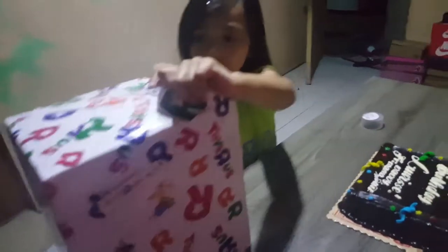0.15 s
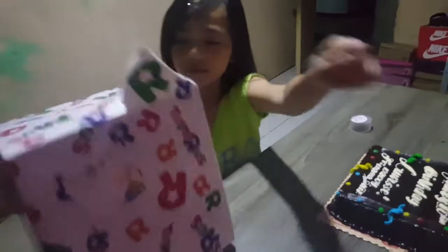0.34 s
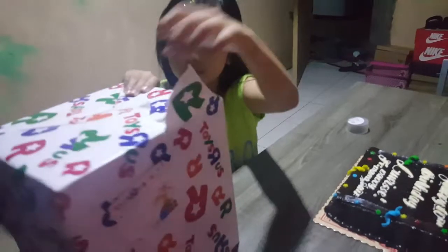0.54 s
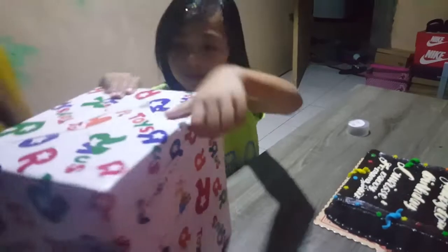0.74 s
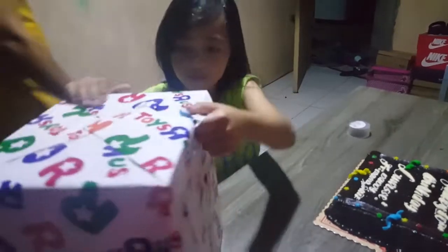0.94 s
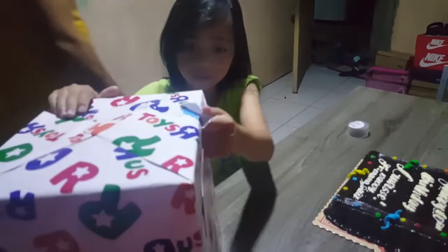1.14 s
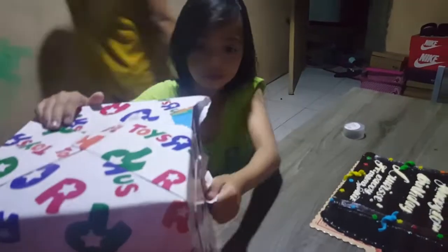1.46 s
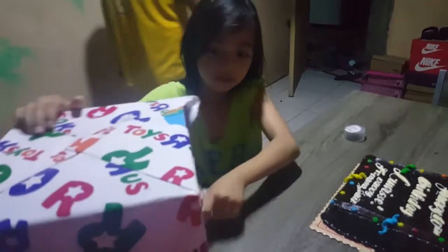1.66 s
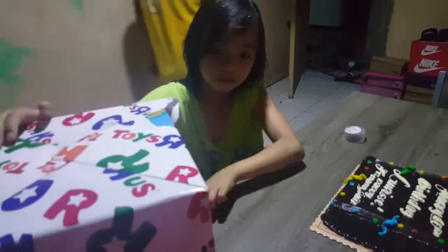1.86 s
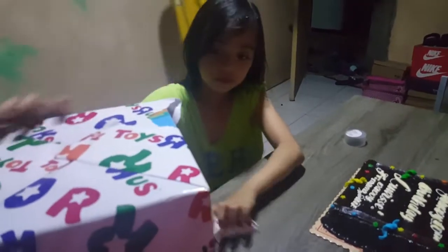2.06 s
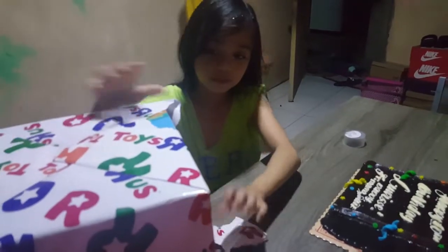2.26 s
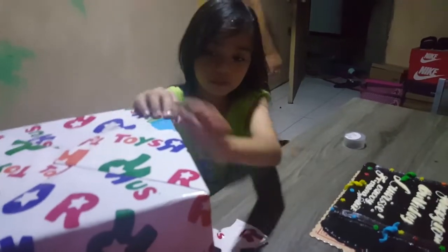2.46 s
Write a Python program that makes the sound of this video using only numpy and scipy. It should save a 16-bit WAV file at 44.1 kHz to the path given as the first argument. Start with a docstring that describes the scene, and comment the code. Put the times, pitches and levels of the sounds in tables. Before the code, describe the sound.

Wrapping paper tears off a cardboard box in a small reverberant room. Light rustles and snaps lead to a loud jerking rip and knock at 0.2 s, then hollow scraping and low judder to 0.6 and again near 0.8. Sound drops out from 1.05 to 1.2. A second crackling rip at 1.3 ends in a deep thud at 1.45; a strip peels from 1.6 to 1.9, a scrape, then snaps at 2.2 and a faint squeak.

```python
"""In a small, hard-walled room, wrapping paper is pulled and torn off a cardboard box.
Tearing and rubbing are dense runs of clicks over a fine hiss; sheet snaps and one hand rub are rough rings with a crack.
The knocked box is a push, a thud and ringing panels; it judders over the floor as a wavering low tone.
Cardboard scrapes are a hollow rumble of clicks, with one faint squeak. Quiet air noise lies under it all.
The sound drops out once, briefly."""
import sys
import numpy as np
from scipy import signal
from scipy.fft import rfft, irfft, next_fast_len
from scipy.io import wavfile
from scipy.ndimage import uniform_filter1d, map_coordinates

SR = 44100
rng = np.random.default_rng(int(sys.argv[2]) if len(sys.argv) > 2 else 0)


def put_to_file(sound):
    """Save the sound as 16-bit audio at rate SR, in the file named by the first command-line argument."""
    columns = np.atleast_2d(sound).T  # one column per channel
    safe = np.clip(columns, -1, 1)
    whole_steps = np.round(safe * 32767)
    wavfile.write(sys.argv[1], SR, whole_steps.astype(np.int16))


N = 114660  # length in samples


def amp(db):
    """Turn decibels into a gain."""
    return 10 ** (np.asarray(db) / 20)


def unit(x):
    """Scale a signal to an average strength (rms) of 1."""
    return x / np.sqrt(np.mean(x ** 2) + 1e-20)


def along(points, hz):
    """Read a curve of (Hz, value) points on a log frequency axis."""
    point_hz, values = np.transpose(points)
    return np.interp(np.log(hz + 1), np.log(point_hz + 1), values)


def level(rows):
    """Gain for each sample from (seconds, dB) points, practically silent outside them."""
    seconds, db = np.transpose(rows)
    return amp(np.interp(np.arange(N) / SR, seconds, db, left=-120, right=-120))


def filtered(x, response):
    """Multiply the spectrum of x by a function of frequency."""
    n = x.shape[-1]
    padded = next_fast_len(n + 8192)
    return irfft(rfft(x, padded) * response(np.fft.rfftfreq(padded, 1 / SR)), padded)[..., :n]


def coloured(x, colour, size=4096):
    """Give x a tone colour with a filter that never sounds ahead of its input; rms becomes 1."""
    log_gain = along(colour, np.fft.rfftfreq(size, 1 / SR)) * np.log(10) / 20
    # folding the cepstrum into its first half makes the filter minimum-phase
    cepstrum = irfft(log_gain)
    cepstrum[1:size // 2] *= 2
    cepstrum[size // 2 + 1:] = 0
    impulse = irfft(np.exp(rfft(cepstrum)))
    return unit(signal.fftconvolve(x, impulse)[:len(x)])


def wobble(rate):
    """A smooth random curve through `rate` random points a second."""
    knots = rng.standard_normal(4096)
    return map_coordinates(knots, [np.arange(N) * rate / SR], mode="wrap")


def add(track, s, sound):
    """Mix a sound into the track at s seconds."""
    part = track[max(0, round(s * SR)):][:len(sound)]
    part += sound[:len(part)]


def crackle(rate, colour, spread_db, clump_db, patchy_db, hiss_db):
    """Clumped clicks of uneven size and changing colour over a fine hiss, at rms 1."""
    hits = rng.random(N) < rate / SR
    signs = np.sign(rng.standard_normal(N))
    sizes = amp(spread_db * np.minimum(rng.exponential(size=N), np.pi))
    hiss = amp(hiss_db) * rng.standard_normal(N)
    run = (unit(hits * signs * sizes) + hiss) * amp(clump_db * wobble(220))
    # random patches in time and frequency are made louder or softer
    spectrum = signal.stft(run, nperseg=128)[2]
    field = uniform_filter1d(rng.standard_normal(spectrum.shape), size=3, axis=0)
    field = uniform_filter1d(field, size=4, axis=1)
    patchy = signal.istft(spectrum * amp(patchy_db * unit(field)))[1][:N]
    return coloured(patchy, colour)


def diffuse(pair):
    """Blend two unrelated signals into left and right that are alike in the bass and differ higher up."""
    # Each row: frequency in Hz, left-right likeness (1 is identical)
    likeness = [(100, 0.89), (350, 0.99), (700, 0.21), (1500, 0.15), (10000, 0.033)]

    def shares(hz):
        turn = np.arccos(np.clip(along(likeness, hz), -1, 1)) / 2
        return np.array([np.cos(turn), np.sin(turn)])

    mid, side = filtered(pair, shares)
    return np.array([mid + side, mid - side])


def room_air():
    """The room's quiet air: steady noise, strongest in the bass and spread over both sides."""
    # Tone colour of the air. Each row: frequency in Hz, strength in dB per Hz
    air_colour = [(20, -18.5), (60, -13.5), (130, 3.5), (400, -4.5), (1000, -8), (2600, -13), (5000, -26),
                  (15000, -43)]
    air_db = -55.5
    noises = [coloured(rng.standard_normal(N), air_colour) for _ in range(2)]
    return amp(air_db) * diffuse(np.array(noises))


def squeak():
    """A faint, short, slightly unsteady tone."""
    # Each row: time in seconds, level in dB
    squeak_levels = [(2.34, -62), (2.362, -50.5), (2.382, -55)]
    squeak_hz = 630  # middle pitch
    pitch = squeak_hz * (1 + 0.0053 * wobble(43))
    return level(squeak_levels) * unit(np.sin(2 * np.pi * np.cumsum(pitch) / SR))


def scrape():
    """Small slips of the cardboard make a hollow rumble as the box is shoved and turned."""
    # Each row: time in seconds, level in dB
    scrape_levels = [(0, -52.5), (.085, -38), (.2, -51.5), (.32, -36), (.375, -29), (.45, -32.5),
                     (.53, -53), (.73, -67), (.78, -52), (.88, -46), (1.0, -52.5), (1.25, -60.5),
                     (1.3, -41.5), (1.6, -48), (1.86, -64), (1.89, -31), (1.94, -54), (2.1, -56.5)]
    # Tone colour of the scrape. Each row: frequency in Hz, strength in dB per Hz
    scrape_colour = [(25, -28.5), (90, -2.5), (200, -0.5), (350, 0), (550, -4), (750, -10.5), (1100, -10),
                     (4000, -47.5)]
    slips = crackle(900, scrape_colour, spread_db=-1, clump_db=5.5, patchy_db=0, hiss_db=-9.5)  # 900 slips a second
    return level(scrape_levels) * slips


def drag():
    """The box judders over the floor in stick and slip: a wavering low tone and its octave."""
    # Each row: time in seconds, level in dB, before a slight random waver
    drag_levels = [(0, -52.5), (.1, -60), (.19, -62), (.25, -47), (.31, -52.5), (.38, -32), (.48, -33),
                   (.59, -37), (.65, -61), (.75, -70), (.775, -38), (.89, -31), (1.04, -39.5),
                   (1.21, -43.5), (1.34, -50), (1.6, -62), (2.48, -61.5), (2.53, -49), (2.6, -62)]
    # The judder's octave. Each row: time in seconds, level against the low tone in dB
    octave_levels = [(.3, -1), (.42, -1.5), (.52, -8.5), (.8, -17.5), (1.3, -10.5)]
    judder_hz, jitter = 56.3, .05  # middle pitch, its random scatter as a fraction
    phase = 2 * np.pi * np.cumsum(judder_hz * (1 + jitter * wobble(25))) / SR
    octave_db = np.interp(np.arange(N) / SR, *np.transpose(octave_levels))
    tone = unit(np.sin(phase) + amp(octave_db) * np.sin(2 * phase))
    return level(drag_levels) * tone * amp(0.59 * wobble(18))


def knocks():
    """The struck box shoves the air with a low push, thuds dully and rings in its cardboard panels."""
    # Each row: start in seconds, level in dB
    knock_rows = [(0.078, -37), (0.141, -39), (.218, -21.5), (0.243, -22.5), (.762, -38), (1.451, -14.5),
                  (1.4605, -16.5), (1.476, -24.5), (1.88, -35.5), (1.889, -44.5), (2.512, -42)]
    # Ringing tones of the panels, varied a little at each knock.
    # Each row: middle pitch in Hz, middle level in dB, time to fall by 60 dB in seconds
    box_modes = [(103.7, -8, 0.37), (150.3, 0, .22), (176, -1, 0.033), (250, -32, 0.12), (302.3, 2.5, 0.21),
                 (407.3, -7.5, 0.18), (571.5, -1.5, 0.11), (694, -2, 0.048)]
    # Tone colour of the thud. Each row: frequency in Hz, strength in dB per Hz
    thud_colour = [(40, -24), (100, 0), (200, 6), (420, 2.5), (700, -16.5), (1500, -2), (5000, -50.5)]
    ring_db, thud_db, push_db = -9.5, -3, -3.5
    thud_t60, push_t60, push_hz = 0.082, 0.033, 163  # seconds to fall by 60 dB; Hz
    out, t = np.zeros(N), np.arange(SR // 2) / SR
    fall = -60 * t  # divided by a t60, this is the fading in dB
    angle = 2 * np.pi * push_hz * t
    # the push is the slope of a fading swing
    push = np.gradient((1 - np.cos(angle)) * amp(push_db + fall / push_t60), angle)
    for s, db in knock_rows:
        ring = np.zeros(len(t))
        for hz, mode_db, t60 in box_modes:
            strength = amp(mode_db + rng.normal(0, 3.6) + fall / t60)
            ring += strength * np.sin(2 * np.pi * hz * (1 + rng.normal(0, 0.0053)) * t)
        thud = coloured(rng.standard_normal(len(t)), thud_colour) * amp(fall / thud_t60)
        add(out, s, amp(db) * (push + amp(ring_db) * ring + amp(thud_db) * thud))
    return out


def snaps_and_rub():
    """Snaps of the sheet and one longer hand rub, each a crack and a rough ring, as (sound, wet dB) pairs."""
    # Snaps of the sheet, and at .885 s a longer rub of the hand on cardboard.
    # Each row: start in seconds, level in dB, middle pitch in Hz, time for the ring to fall by 60 dB
    # in seconds, room sound over direct sound in dB
    ring_rows = [(.0145, -29.5, 1696, 0.016, -12.5), (.067, -29, 2790, 0.034, -3),
                 (.111, -23.5, 2416, 0.043, -9), (.2168, -7.5, 2510, 0.023, -9.5),
                 (0.215, -14.5, 6060, 0.01, -4.5), (0.2232, -3, 1745, 0.026, -6),
                 (.278, -13.5, 1800, 0.018, -10.5), (.885, -38, 1626, 0.11, -4.5),
                 (.976, -34.5, 3540, 0.0063, 4.5), (1.254, -30, 6000, 0.013, -6),
                 (1.263, -22.5, 1412, 0.023, -12), (1.294, -37, 5060, 0.01, -5.5),
                 (1.3265, -11, 1690, 0.019, -2.5), (1.3323, -21, 3820, 0.013, -5),
                 (1.333, -21, 1753, 0.034, -2.5), (1.363, -15.5, 3500, 0.0061, -1),
                 (1.393, -21, 4410, 0.054, -9.5), (1.41, -17, 3330, 0.02, -16.5),
                 (2.2075, -23.5, 2580, 0.018, -2), (2.207, -43.5, 4910, 0.035, -5),
                 (2.214, -33, 2920, 0.032, 1), (2.21, -33, 1400, 0.019, -4), (2.512, -42, 3015, 0.011, 3.5)]
    # Tone colour of the crack. Each row: multiple of the ring's pitch, strength in dB per Hz
    crack_colour = [(.1, -11.5), (.4, -15), (.8, 4.5), (1.4, 1), (3, -15), (8, -22.5)]
    pitch_scatter, rise_s = 0.1, 0.0006  # fraction of the pitch; seconds
    crack_db, crack_t60 = -2.5, 0.019  # dB; seconds to fall by 60 dB
    pairs, t = [], np.arange(SR // 8) / SR
    fall = -60 * t
    attack = 1 - np.exp(-t / rise_s)
    for s, db, hz, t60, wet_db in ring_rows:
        pitch = hz * (1 + pitch_scatter * wobble(hz)[:len(t)])
        ring = np.sqrt(2) * np.sin(2 * np.pi * np.cumsum(pitch) / SR)
        colour = [(multiple * hz, gain) for multiple, gain in crack_colour]
        crack = coloured(rng.standard_normal(len(t)), colour)
        sound = ring * amp(fall / t60) + amp(crack_db + fall / crack_t60) * crack
        out = np.zeros(N)
        add(out, s, amp(db) * attack * sound)
        pairs.append((out, wet_db))
    return pairs


def tearing():
    """Fibres break in clicks in three tears, from coarse to fine, and hands rub on the sheet."""
    # First rip (a sudden jerk), second rip (gathering speed), a strip peeling down the side,
    # hands rubbing on the paper. Each row: time in seconds, level in dB
    jerk_levels, rip_levels = [(.216, -19.5), (.245, -17.5), (.285, -28), (.32, -34), (.37, -33.5),
                               (.45, -69)], [(1.275, -35.5), (1.324, -38.5), (1.332, -27), (1.355, -25.5),
                                             (1.395, -19.5), (1.44, -25), (1.475, -36), (1.51, -77.5),
                                             (1.56, -59.5)]
    peel_levels, rub_levels = [(1.62, -43), (1.71, -33.5), (1.77, -32.5), (1.85, -34), (1.87, -52),
                               (1.92, -42.5), (2.02, -63)], [(0, -39), (.05, -52), (.07, -38.5), (.17, -40), (.21, -39.5),
                                             (.5, -53.5), (.73, -56.5), (.83, -44.5), (.91, -47.5),
                                             (1.04, -48.5), (1.2, -45), (1.25, -53.5), (2.0, -52),
                                             (2.19, -57), (2.28, -53.5), (2.34, -88), (2.5, -79),
                                             (2.53, -61)]
    # Tone colours of the paper. Each row: frequency in Hz, strength in dB per Hz
    jerk_colour, rip_colour = [(60, -27.5), (200, -0.5), (450, -8), (950, -13), (1650, -5.5), (2800, -1),
                               (4500, -8), (7500, -18.5), (9300, -12.5), (11500, -18.5), (15500, -21)], [(60, -19.5), (250, 0.5), (800, -7.5), (1600, -5),
                                                    (2300, -4.5), (3700, -1.5), (6500, -9.5), (9300, -7.5),
                                                    (11500, -10), (15500, -16.5)]
    peel_colour, rub_colour = [(60, -7), (200, -3), (600, -0.5), (1000, -4), (1500, -1), (3500, -4),
                               (4300, -2), (5500, -7.5), (7500, -8), (9400, -3), (11000, -9.5),
                               (15500, -14)], [(60, -14), (350, 0.5), (900, -8), (1600, 1), (2500, -1),
                                                    (4500, -5), (6500, -7.5), (8200, -9), (9300, -2.5),
                                                    (10500, -9.5), (15500, -15)]
    jerk_rate, rip_rate, peel_rate, rub_rate = 1500, 2400, 5000, 2100  # fibre breaks or slips a second
    jerk = crackle(jerk_rate, jerk_colour, spread_db=4, clump_db=3.5, patchy_db=3.0, hiss_db=-14)
    rip = crackle(rip_rate, rip_colour, spread_db=3.5, clump_db=3.0, patchy_db=6.0, hiss_db=-14)
    peel = crackle(peel_rate, peel_colour, spread_db=-1, clump_db=2.5, patchy_db=3.1, hiss_db=-6)
    rub = crackle(rub_rate, rub_colour, spread_db=-0.5, clump_db=4.5, patchy_db=4.3, hiss_db=-2.5)
    held_rub_levels = rub_levels + [(N / SR, rub_levels[-1][1])]  # the last level lasts to the end
    tears = level(jerk_levels) * jerk + level(rip_levels) * rip + level(peel_levels) * peel
    return tears + level(held_rub_levels) * rub


def room_tail():
    """One stereo tail of the room: noise in which each frequency dies at its own speed."""
    # Each row: frequency in Hz, time to fall by 60 dB in seconds
    fade_times = [(100, 0.43), (500, 0.43), (2500, 0.55), (5000, 0.48), (10000, 0.32), (15000, 0.29)]
    wall_gap_s = 0.0023  # silence ahead of the echoes, and then their fade-in time
    noise = diffuse(rng.standard_normal((2, SR * 2 // 3)))
    hz, t, spectrum = signal.stft(noise, SR, nperseg=256)
    tail = signal.istft(spectrum * amp(-60 * t / along(fade_times, hz)[:, None]), SR)[1]
    tail = tail * np.clip(np.arange(tail.shape[1]) / SR / wall_gap_s - 1, 0, 1)
    return tail / np.linalg.norm(tail[0])


def in_room(sources, count=5):
    """Direct sound reaches the right first; the echo pattern changes steadily, every few hundredths of a second."""
    left_lag_s, echo_shift_s = 0.000242, .035  # left behind right; time between echo patterns
    # each (sound, wet dB) pair is split into direct and room sound at the same total power
    near = sum(x / np.hypot(1, amp(wet_db)) for x, wet_db in sources)
    sent = sum(x / np.hypot(1, amp(-wet_db)) for x, wet_db in sources)
    # the tails take turns, each fed more and then less as the next one starts
    place = np.arange(N) / SR / echo_shift_s
    wet = np.zeros((2, N))
    for k in range(count):
        share = np.sin(np.pi / 2 * np.minimum((place - k) % count, 2))
        wet += signal.fftconvolve((sent * share)[None], room_tail(), axes=1)[:, :N]
    # half the lag delays the left, half advances the right
    sides = np.array([[-1], [1]])
    direct = filtered(near, lambda hz: np.exp(1j * np.pi * hz * left_lag_s * sides))
    return wet + direct


def scene():
    """Paper and box in the room, over its quiet air."""
    paper_wet_db, knock_wet_db, box_wet_db, judder_wet_db = 4, -8.5, -4, -12  # room over direct sound
    box = [(drag(), judder_wet_db), (scrape() + squeak(), box_wet_db), (knocks(), knock_wet_db)]
    paper_and_hand = snaps_and_rub() + [(tearing(), paper_wet_db)]
    return room_air() + in_room(box + paper_and_hand)


def record(dry):
    """The right side is louder, the deepest bass is cut, the sound drops out once and the top is cut off."""
    # Each row: frequency in Hz, left over right in dB
    balance = [(60, -1.6), (300, -2.5), (1300, -2.5), (2800, -7), (5500, -8.5), (9500, -3), (14000, -3.5)]
    # Start and end of the dropout in seconds
    gap_start, gap_end = (1.0535, 1.192)
    low_cut_hz, top_hz = 52, 15900

    def response(hz):
        sides = amp(along(balance, hz) * np.array([[.5], [-.5]]))
        return sides * hz ** 2 / np.hypot(hz ** 2, low_cut_hz ** 2)

    t = np.arange(N) / SR
    sounding = (t < gap_start) | (t > gap_end)
    return filtered(filtered(dry, response) * sounding, lambda hz: hz < top_hz)


dry = scene()
out = record(dry)
put_to_file(out)
```